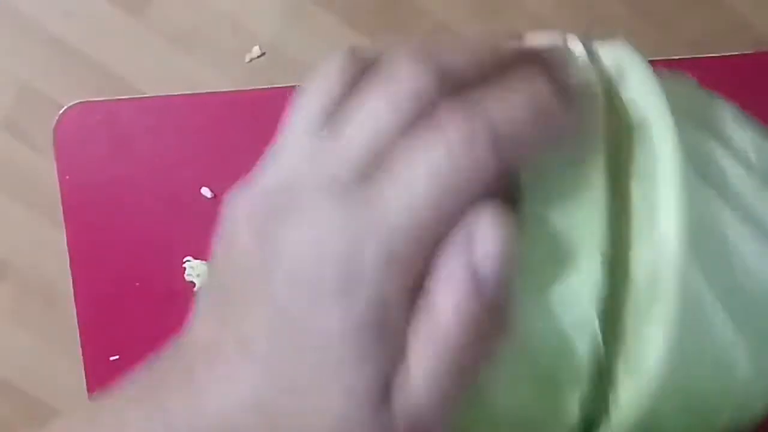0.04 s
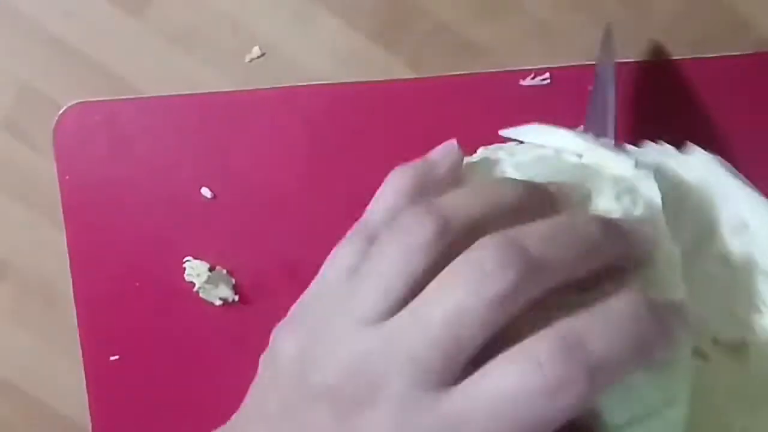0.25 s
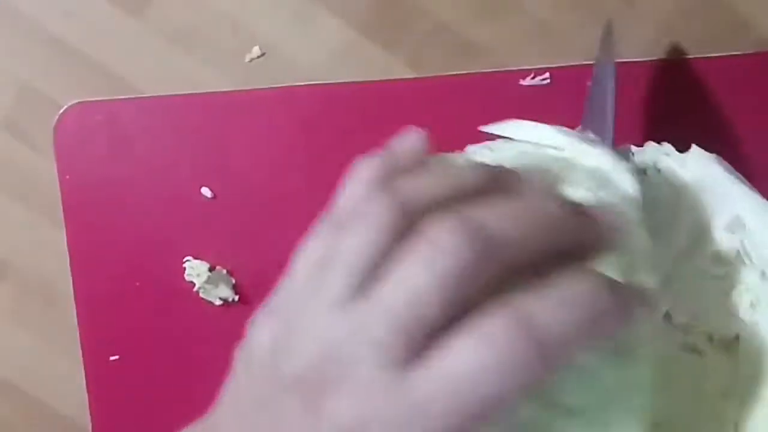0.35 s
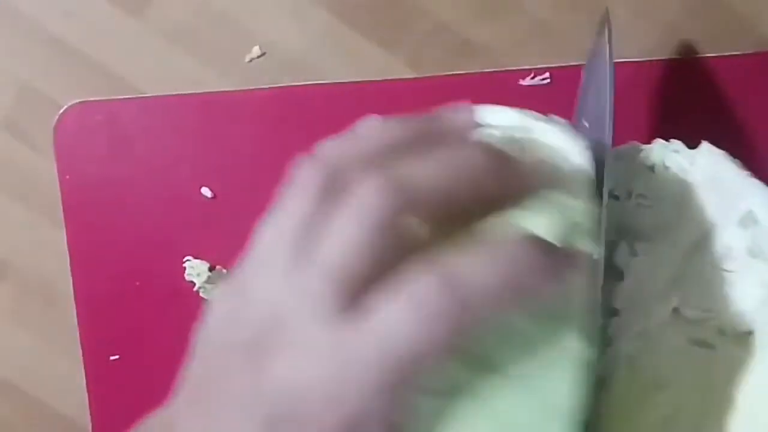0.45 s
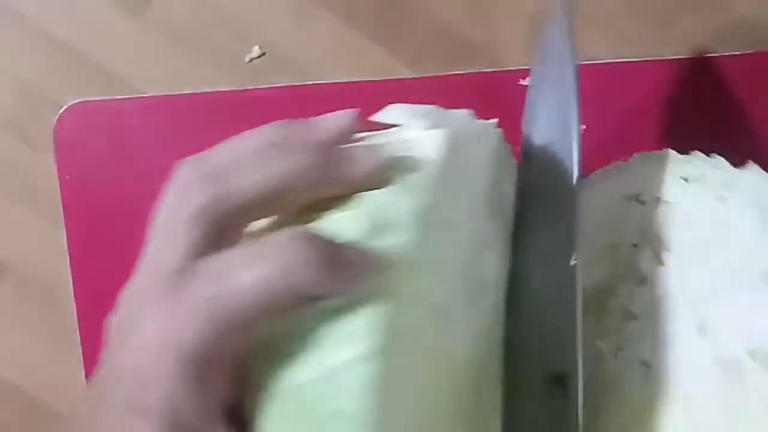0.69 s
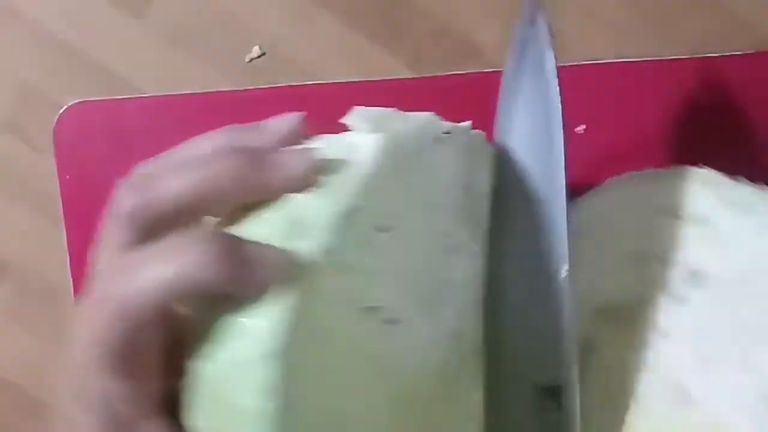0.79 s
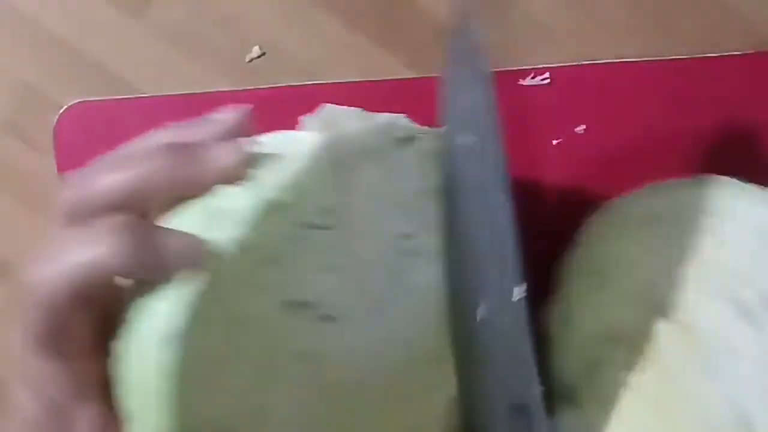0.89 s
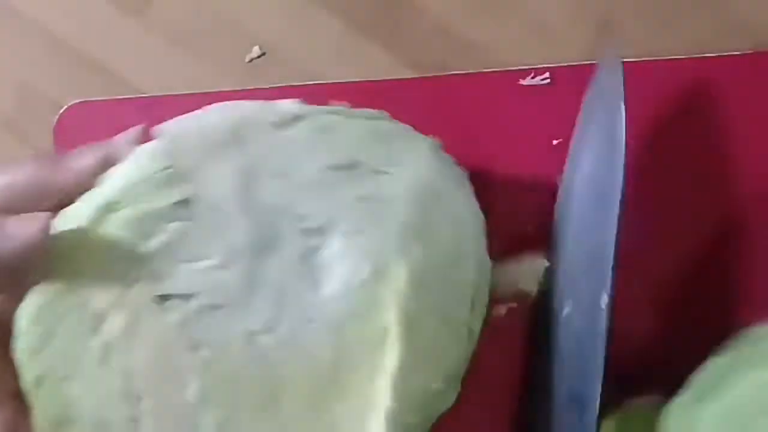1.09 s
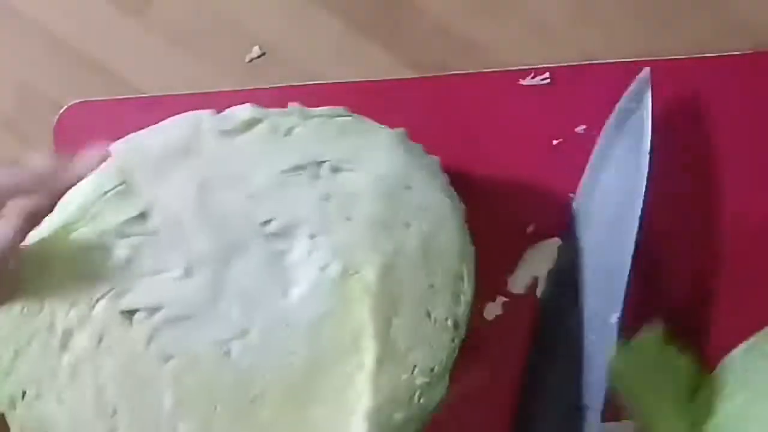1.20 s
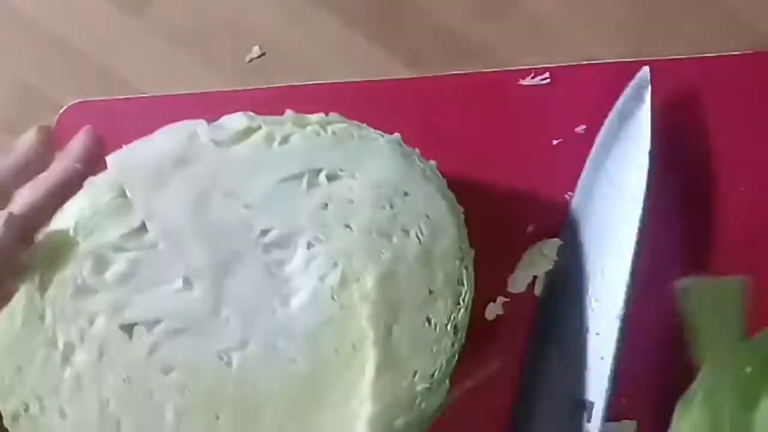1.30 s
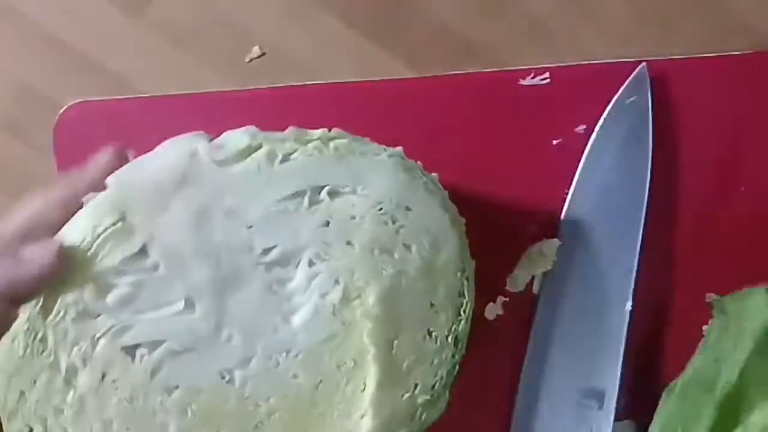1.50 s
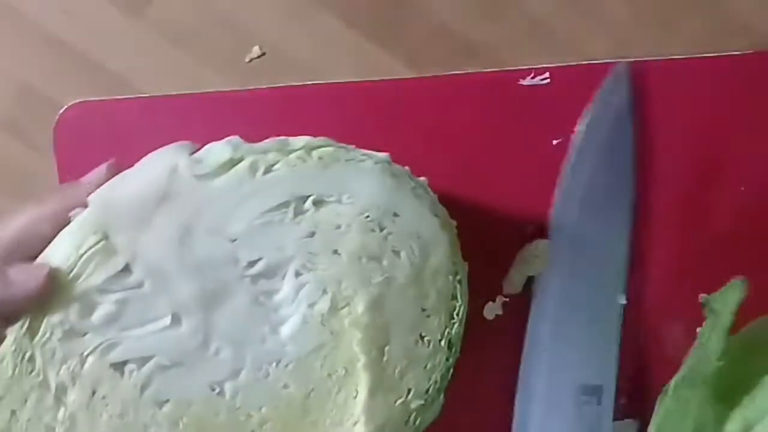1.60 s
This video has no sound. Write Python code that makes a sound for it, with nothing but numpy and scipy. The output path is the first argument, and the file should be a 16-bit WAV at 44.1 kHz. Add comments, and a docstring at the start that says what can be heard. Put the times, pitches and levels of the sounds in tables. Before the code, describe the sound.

A cabbage splits with a dull crunch as a knife pushes through and knocks on the cutting board. The halves are pulled apart, leaves rustling and snapping, and settle with soft thuds, close by in a quiet kitchen.

```python
"""Splitting a cabbage

A knife finishes its way through a cabbage and strikes the board; the core tears with a dull crunch.
The halves are pulled apart, leaves rustling and snapping, and settle on the board with low thuds.
Rustle and crunch are thousands of tiny clicks; the blade and board ring with quickly fading tones.
The microphone is close by, in a quiet kitchen."""
import sys
import numpy as np
from scipy import signal
from scipy.io import wavfile
from scipy.ndimage import uniform_filter1d

SR = 44100
rng = np.random.default_rng(int(sys.argv[2]) if len(sys.argv) > 2 else 0)


def pcm_store(signal):
    """Save signal as 16-bit PCM."""
    levels = np.round(np.clip(np.atleast_2d(signal), -1, 1) * 32767)
    wavfile.write(sys.argv[1], SR, levels.astype(np.int16).T)


N = 72765

# how loud the leaves rustle, before the treble changes: (time [s], level [dB])
RUSTLE_LEVELS = [(0, -46.5), (.03, -46), (.07, -56), (.11, -45.5), (.16, -46), (.205, -42), (.21, -39),
                 (.25, -28.5), (.258, -38.5), (.27, -43), (.3, -48), (.38, -48), (.45, -60), (.48, -46.5),
                 (.55, -54), (.62, -45), (.68, -38), (.72, -44.5), (.76, -41.5), (.85, -40), (.97, -42),
                 (1.0, -44.5), (1.05, -45.5), (1.1, -46.5), (1.17, -44), (1.22, -41), (1.28, -55),
                 (1.31, -44), (1.35, -44), (1.37, -54.5), (1.41, -53), (1.49, -61.5), (1.53, -49.5),
                 (1.56, -46.5), (1.6, -55), (1.65, -47.5)]
# tone of a snapping leaf, with the microphone's lift in the highest treble:
# (frequency [Hz], level [dB])
LEAF_AND_MIC_TONE = [(500, -36.5), (850, -6.5), (1130, -10), (1320, -2), (2100, -5.5), (3030, -3.5),
                     (4170, -5), (4940, 0.5), (5660, -4.5), (6470, 1.5), (7680, -10), (9810, -14.5),
                     (12500, -23), (13900, -23), (14500, -15.5), (15800, -10)]
# cabbage dragging on the board: (time [s], level [dB])
DRAG_LEVELS = [(0, -67), (.2, -61), (.6, -65), (.7, -58), (.76, -50), (.81, -53.5), (.85, -48), (.92, -48),
               (1.0, -53), (1.08, -54), (1.15, -61.5), (1.65, -69)]
# ringing tones of board and counter: (frequency [Hz], level [dB], time to fade by 60 dB [s])
BOARD_TONES = [(74, -3, 0.37), (93.4, -8.5, 0.28), (189, -2, 0.12), (258, -13.5, 0.03), (326, 2, 0.04),
               (372, 4.5, 0.023), (553, 1.5, 0.062), (633.4, -2, 0.092), (724, -6.5, 0.12)]
# tone of the kitchen's hum: (frequency [Hz], level [dB])
ROOM_TONE = [(20, -3), (90, 4.5), (250, -3), (500, -10), (1000, -26), (3000, -18), (6000, -46)]
# single leaf cracks:
# (time [s], level [dB], upper pitch [Hz], lower pitch [Hz], fade time [s], lower pitch gain [dB])
LEAF_CRACKS = [(0.082, -42.5, 6250, 2500, 0.0037, 5.5), (0.0936, -36, 5600, 2400, 0.0035, 7),
               (0.143, -35, 4170, 3330, 0.0022, -8), (0.169, -29, 6200, 3340, 0.0031, -6),
               (0.19, -18, 4400, 1710, 0.0021, -2.5), (0.2095, -17, 4530, 2680, 0.0022, 2),
               (0.2125, -21, 4480, 1000, 0.0037, -2), (0.224, -18, 6440, 4200, 0.0021, 5.5),
               (0.475, -39.5, 4690, 2900, 0.0017, 6), (0.627, -35, 6600, 3120, 0.0027, -4),
               (0.688, -37.5, 5300, 2240, .0025, -3), (.744, -40, 6280, 3180, 0.0016, -10),
               (.749, -30.5, 6700, 1630, .0025, -3.5), (0.788, -26.5, 5900, 1310, 0.0032, -2.5),
               (0.825, -35, 6000, 1490, .003, -4), (0.8318, -24.5, 6150, 1330, 0.0033, -2.5),
               (0.954, -28, 6400, 1830, 0.0034, -9), (1.034, -30.5, 6900, 1340, 0.0034, -13),
               (1.059, -31.5, 6900, 1400, 0.0038, -13), (1.1158, -29, 6400, 1730, 0.0029, -11),
               (1.135, -32, 5760, 2800, 0.0018, -10), (1.1566, -30, 4630, 1880, 0.0036, -4),
               (1.165, -28, 6500, 4800, 0.0042, -5), (1.193, -25, 6400, 3100, 0.005, 1.5),
               (1.2, -26, 6500, 3300, 0.0042, -6), (1.265, -49, 5660, 1880, 0.0032, 10),
               (1.2968, -23.5, 4700, 2240, .003, 4), (1.416, -41.5, 6560, 1640, 0.0025, 4),
               (1.441, -45, 4500, 3500, .002, 2), (1.577, -40, 5100, 1770, 0.0036, -13)]
# knocks on the board: (time [s], level [dB], favoured pitch [Hz])
KNOCKS = [(.1, -39.5, 77), (.226, -42, 250), (0.249, -35, 80), (.274, -13, 310), (0.328, -34.5, 85),
          (0.347, -36, 316), (.54, -46.5, 82), (.674, -35, 344), (.75, -38, 183), (.832, -33, 188),
          (0.838, -38.5, 620), (.975, -38.5, 315), (1.037, -43, 355), (1.06, -47, 560), (1.192, -35, 80.5),
          (1.192, -39, 317), (1.196, -43.5, 700), (1.296, -27.5, 82), (1.296, -37.5, 330),
          (1.354, -37.5, 297)]
# the core tearing under the blade: (time [s], level [dB])
TEAR_LEVELS = [(.17, -48.5), (.19, -42), (.205, -46.5), (.212, -28.5), (.25, -33), (.262, -42.5),
               (.285, -26.5), (.35, -25.5), (.4, -37), (.46, -46), (.56, -66)]
# tone of the tearing core: (frequency [Hz], level [dB])
CORE_TONE = [(70, -41), (120, -12), (190, -4.5), (260, -11), (330, -2.5), (700, -6), (1000, -9),
             (1600, -8.5), (2700, -13.5), (3150, -23), (3700, -16), (9000, -36), (12000, -53), (20000, -90)]
# ringing tones of the knife's strike: (frequency [Hz], level [dB], time to fade by 60 dB [s])
STRIKE_TONES = [(1430, 3.5, 0.026), (1792, 3.5, 0.032), (2123, -8, 0.059), (2570, 0, 0.029),
                (3960, -5, 0.023), (4760, -21.5, 0.011)]

CRACK_RISE_S = 0.00087


def amp(db):
    """Turn decibels into a gain."""
    return 10 ** (np.asarray(db) / 20)


def evened(x):
    """Scale a sound to an average power of 1."""
    return x / np.sqrt(np.mean(x ** 2) + 1e-20)


def curve(rows):
    """Join (time, level) points into a gain for every sample."""
    s, db = np.transpose(rows)
    return amp(np.interp(np.arange(N) / SR, s, db))


def add(mix, start_s, sound):
    """Mix a sound in at the given time."""
    part = mix[round(start_s * SR):][:len(sound)]
    part += sound[:len(part)]


def colour(x, tone):
    """Filter a sound to the given tone, ringing only after each click."""
    f, db = np.transpose(tone)
    hz = np.fft.rfftfreq(8192, 1 / SR)
    log_gain = np.interp(np.log(hz + 1), np.log(f), db) * np.log(10) / 20
    mirrored = np.concatenate([log_gain, log_gain[-2:0:-1]])
    spectrum = np.exp(np.conj(signal.hilbert(mirrored)))
    return signal.oaconvolve(x, np.fft.ifft(spectrum).real[:4096])[:len(x)]


def band(x, hz, width=0.15):
    """Keep a narrow band of sound around one pitch."""
    edges = np.clip([hz * (1 - width / 2), hz * (1 + width / 2)], 100, 16000)
    return evened(signal.lfilter(*signal.butter(1, edges, "band", fs=SR), x))


def crackle(per_s, spread_db):
    """Random clicks; more spread makes a few stand out."""
    happens = rng.random(N) < per_s / SR
    size = amp(spread_db * np.minimum(rng.exponential(1, N), 5))
    return happens * size * rng.choice([-1., 1.], N)


def ring(tones, centre_hz=None, rise_s=0.0006):
    """A struck object's fading tones, weaker the further they lie from the centre pitch, if given."""
    t = np.arange(SR // 2) / SR
    out = np.zeros(len(t))
    for hz, db, fade_s in tones:
        loss_db = 12.5 * np.log2(hz / centre_hz) ** 2 if centre_hz else 0
        out += amp(db - loss_db - 60 * t / fade_s) * np.sin(2 * np.pi * hz * t)
    return out * np.minimum(t / rise_s, 1)


def leaf_rustle():
    """Leaves make many tiny snaps that come in clumps, brighter when louder."""
    wander = evened(uniform_filter1d(uniform_filter1d(rng.standard_normal(N), size=250), size=250))
    clicks = crackle(per_s=12000, spread_db=2.5) * amp(1.38 * wander)
    snaps = evened(colour(clicks, LEAF_AND_MIC_TONE))
    low = signal.filtfilt(*signal.butter(2, 8400, fs=SR), snaps)
    level = curve(RUSTLE_LEVELS)
    treble_gain = (level / amp(-49)) ** 0.37  # 0.37 dB more for each dB above -49
    return level * (low + (snaps - low) * treble_gain)


def board_drag():
    """The dragging cabbage gives the board tiny taps that ring a low and a higher group of tones."""
    tap = ring(BOARD_TONES, centre_hz=199) + amp(-1.5) * ring(BOARD_TONES, centre_hz=576)
    rub = signal.oaconvolve(crackle(per_s=500, spread_db=4.5), tap)[:N]
    return curve(DRAG_LEVELS) * evened(rub)


def room_hum():
    """The quiet kitchen: faint, steady, low noise."""
    return amp(-57.5) * evened(colour(rng.standard_normal(N), ROOM_TONE))


def kitchen_echo(x, fade_s=0.099):
    """The room throws back a short echo."""
    t = np.arange(SR // 4) / SR
    tail = rng.standard_normal(len(t)) * amp(-60 * t / fade_s) * (t > .002)
    return amp(-10.5) * signal.oaconvolve(x, tail / np.linalg.norm(tail))[:N]


def leaf_cracks():
    """Each breaking leaf gives a burst of bright noise with two pitches of its own."""
    out, t = np.zeros(N), np.arange(1500) / SR
    for s, db, high_hz, low_hz, fade_s, low_db in LEAF_CRACKS:
        noise, low_noise = rng.standard_normal((2, len(t)))
        shape = np.minimum(t / CRACK_RISE_S, 1) * np.exp(-t / fade_s)
        pitched = band(noise, high_hz) + amp(low_db) * band(low_noise, low_hz)
        hiss = amp(-0.5) * evened(colour(noise, LEAF_AND_MIC_TONE))
        add(out, s - CRACK_RISE_S, amp(db) * shape * (pitched + hiss) / 2)
    return out


def board_thuds():
    """Each knock makes the board and counter ring with a low thud."""
    out = np.zeros(N)
    for s, db, centre_hz in KNOCKS:
        add(out, s, amp(db) * ring(BOARD_TONES, centre_hz, rise_s=0.0031))
    return out


def core_tear():
    """The thick ribs give way in coarser rips: a dull crunch."""
    t = np.arange(N) / SR
    tearing = (t > TEAR_LEVELS[0][0]) & (t < TEAR_LEVELS[-1][0])
    fade_in_out = uniform_filter1d(tearing * 1., size=800)
    rips = evened(colour(crackle(per_s=2500, spread_db=0), CORE_TONE))
    return curve(TEAR_LEVELS) * fade_in_out * rips


def knife_strike(start_s=0.2742, tick_fade_s=0.0029):
    """The knife lands with a tick, and blade and board ring briefly."""
    out, t = np.zeros(N), np.arange(600) / SR
    shape = np.minimum(t / CRACK_RISE_S, 1) * np.exp(-t / tick_fade_s)
    tick = shape * evened(colour(rng.standard_normal(len(t)), LEAF_AND_MIC_TONE))
    add(out, start_s, amp(-11) * tick)
    add(out, start_s, amp(-13) * ring(STRIKE_TONES))
    return out


def scene():
    """Mix everything into one channel; leaves, core and knife get the echo."""
    near = leaf_rustle() + leaf_cracks() + core_tear() + knife_strike()
    return (near + kitchen_echo(near) + board_drag() + board_thuds() + room_hum())[None]


def record(dry, low_hz=45, top_hz=15850):
    """The microphone loses the deepest bass; then sound above top_hz is cut."""
    thinned = signal.lfilter(*signal.butter(2, low_hz, "high", fs=SR), dry)
    treble_cut = signal.firwin(511, top_hz, window=("kaiser", 9), fs=SR)
    return signal.oaconvolve(thinned, treble_cut[None], "same")


dry = scene()
out = record(dry)
pcm_store(out)
```